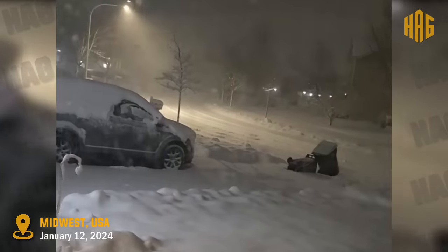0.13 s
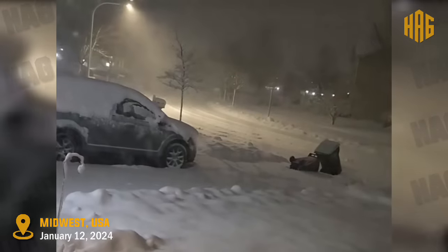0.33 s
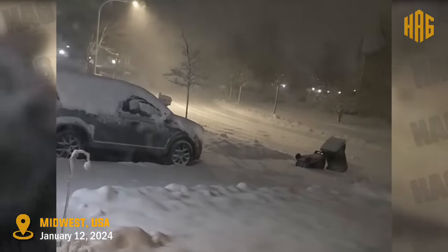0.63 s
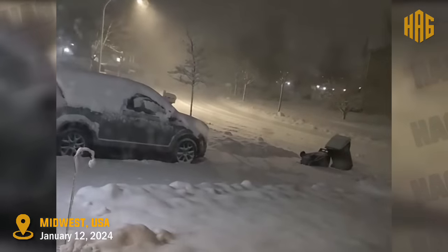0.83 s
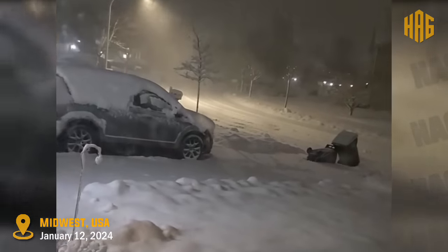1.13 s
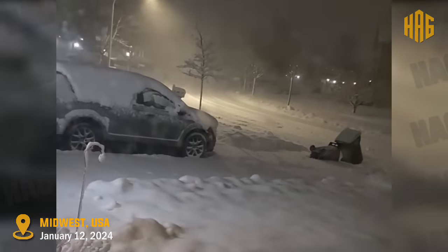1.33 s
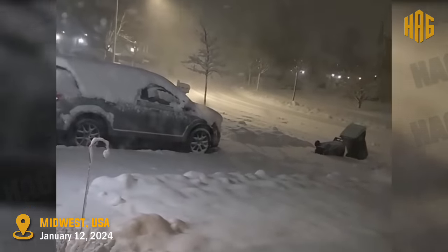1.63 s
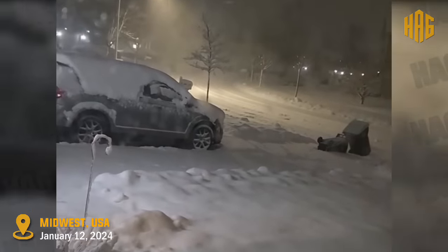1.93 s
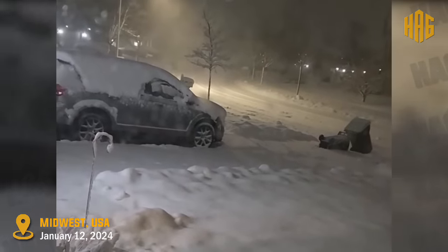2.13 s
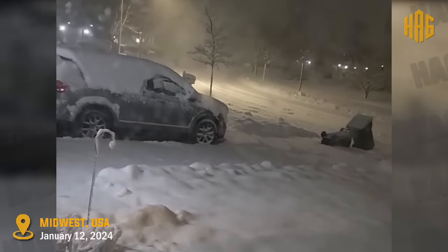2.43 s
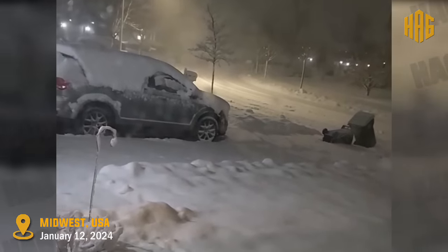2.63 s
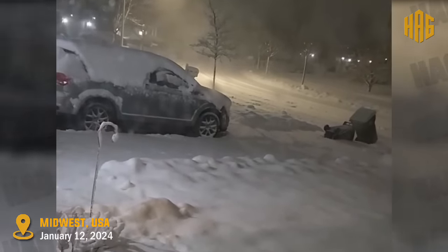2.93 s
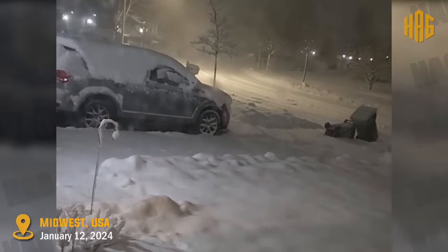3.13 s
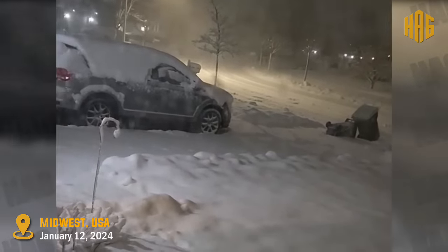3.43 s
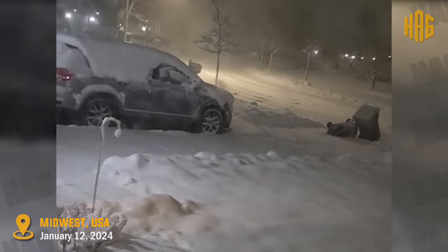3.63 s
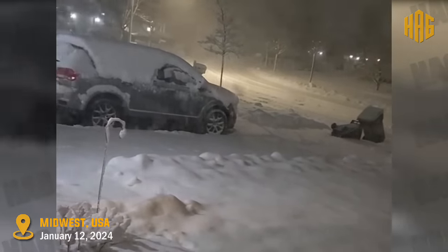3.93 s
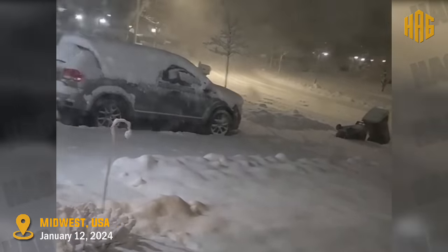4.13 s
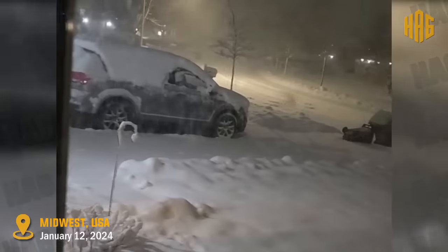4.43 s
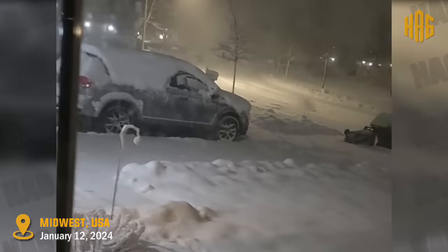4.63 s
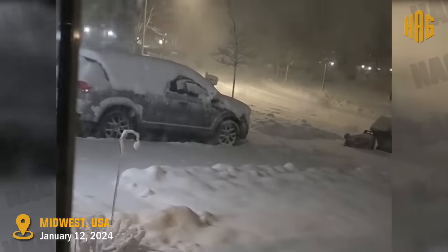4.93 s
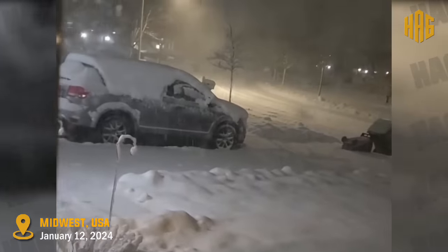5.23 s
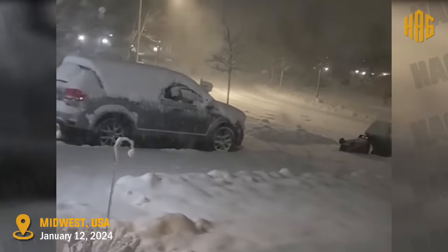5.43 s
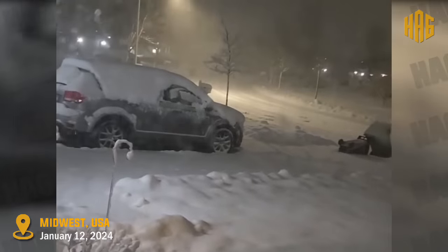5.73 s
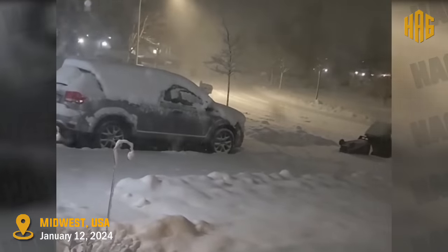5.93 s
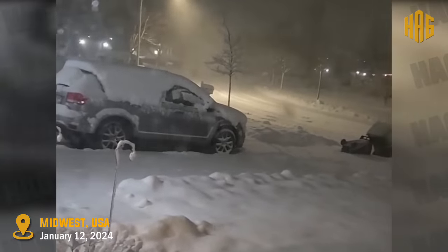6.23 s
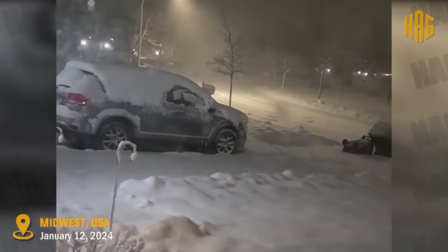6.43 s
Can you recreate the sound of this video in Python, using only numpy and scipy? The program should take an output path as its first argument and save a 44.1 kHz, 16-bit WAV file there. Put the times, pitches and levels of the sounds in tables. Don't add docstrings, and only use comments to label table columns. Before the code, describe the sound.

Strong storm wind presses on a house, giving a continuous dull low rumble with fuzzy wandering tones. A faint motor hum throbs underneath. Tiny finger knocks come early; after about four seconds a sleeve rustles and the phone's plastic case creaks and ticks very close to the microphones, then quiets. Heard indoors at a window on a snowy night.

```python
import sys
import numpy as np
from scipy import signal
from scipy.io import wavfile
from scipy.ndimage import uniform_filter1d

SR = 44100
rng = np.random.default_rng(int(sys.argv[2]) if len(sys.argv) > 2 else 0)


def wav_out(sig):
    wavfile.write(sys.argv[1], SR, np.round(np.clip(np.atleast_2d(sig).T, -1, 1) * 32767).astype(np.int16))


def gain_from_db(level_db):
    decades = np.asarray(level_db, float) / 20
    return 10 ** decades


N = 289869


def evened(x):
    return x / np.sqrt(np.mean(x ** 2) + 1e-20)


def peaked(x):
    return x / abs(x).max(axis=1, keepdims=True)


def read(points, hz):
    f, value = np.transpose(points)
    return np.interp(np.log(hz + 1), np.log(f + 1), value)


def curve(rows, t):
    return np.interp(t, np.array(rows)[:, 0], np.array(rows)[:, 1])


def drift(top_hz):
    r = np.exp(-2 * np.pi * top_hz / SR)
    return evened(signal.lfilter([1], [1, -2 * r, r * r], rng.standard_normal(N)))


def resonate(x, hz, width):
    turn = np.exp(2j * np.pi * np.cumsum(hz * np.ones(x.shape[-1])) / SR)
    r = np.exp(-np.pi * width / SR)
    return 2 * (turn * signal.lfilter([1 - r], [1, -r], x / turn)).real


def resonate_twice(x, hz, width, second_width):
    return resonate(resonate(x, hz, width), hz, second_width)


def sides(db):
    return gain_from_db(np.array([[min(db, 0)], [min(-db, 0)]]))


def add(mix, s, sound):
    part = mix[:, round(s * SR):][:, :sound.shape[1]]
    part += sound[:, :part.shape[1]]


# frequency in Hz, likeness from -1 to 1.
LIKENESS = [(60, 0.97), (130, 0.97), (290, 0.85), (640, 0.27), (1000, -0.35), (1400, -0.15), (3100, 0.05),
            (15000, 0.043)]
# frequency in Hz, left-right difference in dB.
LEAN = [(60, 1), (180, 0), (550, 2.5), (1650, 2), (4970, 2.5), (15000, 3.5)]


def noise(shape, size, patchy_db, flicker_db):
    hop = size // 4
    frames, hz = N // hop + 5, np.fft.rfftfreq(size, 1 / SR)
    a, b, c, d, patches = rng.standard_normal((frames, len(hz), 5)).T
    for axis in (0, 1):
        patches = uniform_filter1d(patches, size=9, axis=axis, mode="wrap")
    same = np.clip(read(LIKENESS, hz), -1, 1)[:, None]
    left = a + 1j * b
    right = same * left + np.sqrt(1 - same ** 2) * (c + 1j * d)
    z = np.array([left, right])
    z *= gain_from_db(np.array([.5, -.5])[:, None, None] * read(LEAN, hz)[:, None])
    z *= shape(hz[:, None], (np.arange(frames) * hop / SR)[None])
    z *= gain_from_db(patchy_db * evened(patches) + flicker_db * rng.standard_normal(frames))
    return signal.istft(z, nperseg=size, noverlap=size - hop)[1][:, :N]


# time in seconds, half length in seconds, level in dB.
PUFFS = [
    (0.591, 0.073, -4),
    (1.0, 0.036, 1.5),
    (1.178, 0.011, -11),
    (2.267, 0.024, 2),
    (3.297, .04, -2),
    (5.44, 0.011, 5),
]


def wind_level(t):
    lull_db, rise_s = -9.5, 0.33
    puffs = sum(db * np.exp(-((t - s) / half) ** 2) for s, half, db in PUFFS)
    return gain_from_db(-36.5 + lull_db * np.exp(-(t / rise_s) ** 2) + puffs)


def sway(s):
    rates = 1.5 * np.geomspace(.1, 1, num=9)[:, None] * rng.uniform(.8, 1.2)
    return evened(np.sin(2 * np.pi * (rates * s + rng.random((9, 1)))).sum(0))


# frequency in Hz, level in dB per Hz.
WALLS = [(15, -46.5), (24, -22.5), (32, -12.5), (45, -14), (70, -10.5), (200, -13.5), (270, -16.5),
         (330, -24), (420, -27.5), (520, -36.5), (700, -76.5)]
# frequency in Hz, width in Hz, level in dB.
HOUSE = [(39.4, 31, -13), (106.4, 13, -2.5), (133.5, 13.5, -3.5), (174.7, 18, -8), (192.2, 6.2, -8),
         (219.1, 9, -8.5), (231.9, 6, -5.5), (240.2, 8, -11), (249.3, 5.35, -3.5), (286, 5.5, -5.5),
         (300, 4.6, -7), (309, 11, -6), (333, 6, -15.5), (353, 6.5, -12.5), (367.1, 5.4, -9.5),
         (381, 3.6, -17.5), (394, 6.7, -24.5), (426.4, 8, -24.5), (477, 7.6, -20), (485.4, 8.8, -14),
         (509, 21, -30.5), (551, 12, -31), (629, 22, -28), (668, 7, -34.5), (743, 5.4, -32),
         (785, 11, -33.5), (840, 10, -36), (932, 6, -34), (1024, 22, -40)]
# time in seconds, half length in seconds, level in dB.
MOANS = [
    (2.2, 0.34, -0.5),
    (5.4, 0.21, -3),
    (5.046, 0.17, 5),
    (6.19, 0.3, -4.5),
    (1.8, 0.12, -2.5),
]


def house(t):
    pane_hz, swell_db, wander = 300, 1.6, .003

    def shape(hz, s):
        moan = sum(db * np.exp(-((s - at) / half) ** 2) for at, half, db in MOANS)
        reach_hz = np.where(moan < 0, 70, 15)
        power = gain_from_db(2 * read(WALLS, hz))
        for f, width, db in HOUSE:
            level = db + swell_db * sway(s) + moan * (abs(f - pane_hz) < reach_hz)
            centre = f * (1 + wander * sway(s))
            power = power + gain_from_db(2 * level) / (1 + (2 * (hz - centre) / width) ** 4)
        return np.sqrt(power)

    return wind_level(t) * evened(noise(shape, size=16384, patchy_db=1., flicker_db=.1))


# time in seconds, level in dB.
SETTLING = [
    (0, -6.5),
    (.3, -10),
    (.6, -4),
    (6.57, -3),
]


def settling_db(t):
    return curve(SETTLING, t)


# frequency in Hz, level in dB.
FAN = [
    (120.0, -37),
    (139.2, -50),
    (77.3, -55),
    (366.2, -65),
]
# time in seconds, throb level in dB.
LOAD = [(0.1, -45.5), (0.28, -45), (0.56, -45), (0.9, -41), (1.13, -53), (1.29, -41), (2.09, -44),
        (2.18, -61), (2.54, -45.5), (2.61, -51.5), (2.75, -41), (3.9, -44), (4.63, -41.5), (4.97, -56),
        (5.47, -43), (6.5, -53.5)]


def fan(t):
    hum = sum(gain_from_db(db + 5.57) * np.cos(2 * np.pi * (hz * t + 0.49)) for hz, db in FAN)
    wheel_hz = 57.5 + 2.2 * drift(4.66)
    wheel = np.cos(2 * np.pi * np.cumsum(wheel_hz) / SR + np.pi)
    return hum * gain_from_db(settling_db(t)) + wheel * gain_from_db(curve(LOAD, t) + 3.5)


# time of the peak in seconds, swell in seconds, fade in seconds,
# rubbing level in dB, level of the brightest part against it in dB.
STROKES = [(0.341, 0.025, 0.66, -80, -15.5), (1.199, 0.16, 0.49, -78, -12), (3.3, 0.27, 0.25, -88.5, -14.5),
           (4.18, 0.13, 0.12, -61.5, -11), (4.46, 0.15, 0.15, -60.5, -15.5),
           (4.641, 0.012, 0.078, -65, -15), (4.77, 0.17, 0.16, -61.5, -12.5),
           (5.12, 0.11, 0.68, -73.5, -10.5), (5.398, 0.54, 0.13, -66, -11),
           (5.563, 0.044, 0.046, -63, -8.5), (5.801, 0.088, 0.13, -74.5, -14),
           (5.904, .05, 0.055, -74.5, -5.5), (6.211, 0.14, 0.34, -83.5, -8.5),
           (6.5, 0.11, 0.11, -75.5, -11)]


def strokes(t, top):
    resting_db, resting_top_db = -89, -7
    power = gain_from_db(2 * (resting_db + top * resting_top_db))
    for s, swell, fade, db, top_db in STROKES:
        length = np.clip(np.where(t < s, swell, fade), .005, 2)
        power = power + gain_from_db(2 * (db + top * top_db)) * np.exp(-2 * abs(t - s) / length)
    return np.sqrt(power)


# frequency in Hz, level in dB per Hz.
CLOTH = [(590, -37.5), (1000, -15.5), (1080, -21), (1330, -7.5), (1460, -8), (1720, -9.5), (2980, -13.5),
         (3270, -15.5), (4120, -12.5), (4520, -13), (5430, -13.5), (6760, -10), (7670, -17.5),
         (9440, -17.5), (15700, -35)]


def sleeve(t):
    def shape(hz, s):
        bright = gain_from_db(13.5) * strokes(s, 0.98) / strokes(s, 0)
        return gain_from_db(read(CLOTH, hz)) * bright ** np.clip((hz - 8500) / 2500, 0, 1)

    rubbing = evened(noise(shape, size=256, patchy_db=1.56, flicker_db=0.9))
    return gain_from_db(9.5) * strokes(t, 0) * rubbing * sides(-3.07)


# time in seconds, level in dB.
STRAIN = [
    (3.9, -90),
    (3.97, -72),
    (4.09, -70),
    (4.115, -56),
    (4.27, -59),
    (4.33, -66),
    (4.37, -57),
    (4.5, -62),
    (4.8, -65),
    (5.0, -70),
]


def strain(t):
    slips = rng.standard_normal((2, N)) * gain_from_db(3.5 * drift(40.))
    hz = 1460
    free = evened(resonate_twice(slips, hz, 150, 260))
    damped = evened(resonate_twice(slips, 1.05 * hz, 600, 850))
    grip = np.interp(t, [4.33, 4.37], [0, 1])
    on = np.interp(t, [3.85, 3.95, 4.95, 5.05], [0, 1, 1, 0])
    return gain_from_db(curve(STRAIN, t) + 1.0) * on * ((1 - grip) * free + grip * damped) * sides(-6.5)


def burst(length, lead, snap):
    u = np.arange(-lead, .06, 1 / SR)
    scrape = np.exp(np.where(u < 0, 3 * u / lead, -u / np.clip(length, .0005, .05)))
    arrival = np.array([[.00014], [0]])
    return snap * np.exp(-((u - arrival) / .00003) ** 2) + scrape * rng.standard_normal((2, len(u)))


# time in seconds, left-right difference in dB.
HAND = [
    (0.4, -1),
    (0.7, 0.5),
    (3.88, 9.5),
    (4.1, -3),
    (4.36, -12),
    (4.5, -8),
    (4.63, -11),
    (4.9, -6),
    (5.55, 2),
    (5.8, 0),
]


def hand_db(s):
    return curve(HAND, s)


# time in seconds, peak in dB, lowest mode in Hz,
# level of the upper modes in dB, length in seconds.
CREAKS = [(4.104, -65, 1300, -10, 0.004), (4.119, -48, 1430, -14, 0.012), (4.233, -61, 1490, -14, 0.01),
          (4.359, -37, 1650, -4, 0.007), (4.388, -47, 1500, 4, 0.0088), (4.418, -38.5, 1500, -7, 0.0029),
          (4.469, -41, 1600, -8, 0.0018), (4.493, -43.5, 1480, -2, 0.0048), (4.507, -47, 1500, -20, 0.005),
          (4.5378, -36, 1560, -22, 0.014), (4.595, -60, 1270, -10, 0.004), (4.629, -39.5, 1530, -14, 0.02),
          (4.751, -47, 1320, -16, 0.008), (4.764, -36, 1580, -9.5, 0.014), (4.855, -39, 1510, -16, 0.0098),
          (4.923, -45, 1430, -16, 0.003)]


def creaks():
    out, lead = np.zeros((2, N)), .009
    opposed = .75
    for s, db, hz, upper_db, length in CREAKS:
        x = burst(length, lead, 13.)
        low = resonate_twice(x, hz, 470, 950)
        low = np.array([(1 - opposed) * low[0] - opposed * low[1], low[1]])
        high = resonate_twice(x, 3900, 1100, 1600) + .15 * resonate(x, 6500, 2200)
        sound = sides(hand_db(s)) * peaked(low) + gain_from_db(upper_db) * sides(-5) * peaked(high)
        add(out, s - lead, gain_from_db(db + 7.0) * sound)
    return out


# time in seconds, level in dB, frequency in Hz,
# width in Hz, length in seconds.
KNOCKS = [(.293, -70, 1350, 300, .005), (.284, -72, 1100, 400, .004), (.298, -65, 2000, 300, .006),
          (.148, -68, 1500, 900, .002), (.36, -64, 1400, 180, .009), (.373, -64, 1430, 250, .007),
          (.372, -69, 1950, 200, .007), (.39, -71, 1700, 1200, .025), (.31, -72, 1800, 1200, .02),
          (.725, -74, 1520, 300, .015), (.51, -76, 2200, 600, .01), (.665, -76, 2100, 200, .02),
          (1.5, -74, 2100, 500, .01), (.38, -79, 7700, 1500, .03), (1.17, -82, 7900, 1700, .07),
          (1.338, -70, 1500, 150, .01), (1.45, -81, 7900, 1700, .08), (3.15, -83, 7900, 1200, .06),
          (3.878, -66, 5350, 400, .007), (3.893, -77, 5300, 700, .015), (3.9, -78, 7700, 1200, .04),
          (4.125, -66, 5500, 1200, .02), (4.178, -61, 4100, 700, .008), (4.476, -51, 4200, 2000, .016),
          (4.172, -60, 6000, 6000, .004), (4.12, -63, 3000, 2500, .012), (4.481, -53, 6200, 900, .006),
          (4.629, -50, 1550, 500, .007), (4.769, -50, 1500, 500, .012), (4.859, -54, 1500, 450, .006),
          (4.48, -60, 1600, 900, .012), (4.778, -61, 7500, 900, .014), (5.568, -64, 1300, 500, .008),
          (5.56, -58, 7800, 700, .003), (5.775, -67, 1300, 500, .008), (5.77, -65, 3700, 500, .004),
          (5.875, -67, 4300, 500, .005), (5.97, -79, 7700, 1500, .09), (6.23, -78, 7800, 1500, .06),
          (6.5, -79, 7700, 1500, .05)]


def knocks():
    out = np.zeros((2, N))
    for s, db, hz, width, length in KNOCKS:
        u = np.arange(-3 * length, 3 * length, 1 / SR)
        rough = evened(resonate_twice(rng.standard_normal((2, len(u))), hz, width, width))
        clear = np.cos(2 * np.pi * (hz * u + rng.random((2, 1))))
        clear = 1.3 * np.exp(-(width / 450) ** 2) * clear
        note = evened((rough + clear) * np.exp(-(u / length) ** 2))
        pan = sides(hand_db(s) * min(1, 2500 / hz))
        add(out, s + u[0], gain_from_db(db) * pan * 2 / 3 * note)
    return out


# time in seconds, peak in dB, centre frequency in Hz,
# left-right difference in dB, length in seconds.
TICKS = [(0.1476, -60.5, 2600, 1, 0.003), (0.1482, -57, 5900, -8, 0.0032), (0.283, -62, 3220, 0, 0.008),
         (0.287, -63, 7600, 0, 0.004), (0.36, -65, 6700, 2, 0.01), (2.086, -62, 5300, 3, 0.02),
         (4.116, -51, 6500, -6, .004), (4.1709, -42, 5000, -13, 0.004), (4.171, -38, 12000, -17, 0.003),
         (4.195, -58, 5000, -4, .002), (4.391, -50, 4500, -9, 0.0034), (4.3891, -49, 12000, -7, .003),
         (4.43, -52, 6500, -9, 0.002), (4.48, -62, 11000, -8, .01), (4.5385, -59, 4500, -1, .003),
         (4.629, -42.5, 3400, 8, .003), (4.756, -52, 5900, -6, 0.0025), (4.763, -49, 3600, -3, .004),
         (4.856, -56, 3200, 4, .003), (5.286, -48.5, 4200, -3, .004), (5.507, -56, 7000, 3, .002),
         (5.5105, -38, 3300, 6, 0.001), (5.5108, -40, 6800, 7, 0.0015), (5.5156, -45, 5200, 4, 0.0023),
         (5.55, -44, 4000, -5, 0.0092), (5.56, -38, 6500, -12, 0.004), (5.5655, -56, 7500, -4, .002),
         (5.769, -62, 4000, -4, 0.0066), (5.9122, -53, 6000, -4, .004), (5.9123, -54, 12000, -13, .004),
         (6.521, -63, 4970, 2, 0.0065)]


def ticks():
    out, lead = np.zeros((2, N)), .003
    no_lows = signal.butter(3, 1100, "high", fs=SR, output="sos")
    for s, db, hz, pan_db, length in TICKS:
        width = 0.52 * hz
        sound = resonate_twice(burst(length, lead, 6.6), hz, width, 2.1 * width)
        sound = resonate(signal.sosfilt(no_lows, sound), hz, 1.5 * width)
        add(out, s - lead, gain_from_db(db + 7.5) * sides(pan_db) * peaked(sound))
    return out


# frequency in Hz, level in dB per Hz.
WHINE = [(400, -30), (520, -4), (600, -2.5), (700, -6.5), (780, -4), (950, -9.5), (1180, -13.5),
         (1450, -14.5), (1750, -25.5), (2100, -21.5), (3000, -29), (4000, -67.5)]


def seals(t):
    whine = noise(lambda hz, _: gain_from_db(read(WHINE, hz)), size=2048, patchy_db=2.2, flicker_db=.1)
    return gain_from_db(settling_db(t) - 59.5) * evened(whine)


# frequency in Hz, level in dB per Hz.
HISS = [(1100, -24.5), (1800, -3.5), (2800, -8), (4500, -8), (6700, -15), (7600, -15.5), (8600, -19),
        (10400, -23), (15700, -22.5)]


def microphone_hiss():
    hiss = noise(lambda hz, _: gain_from_db(read(HISS, hz)), size=1024, patchy_db=2., flicker_db=.4)
    return gain_from_db(-75.5) * evened(hiss)


def scene():
    t = np.arange(N) / SR
    hand = sleeve(t) + strain(t) + creaks() + knocks() + ticks()
    return house(t) + fan(t) + hand + seals(t) + microphone_hiss()


def sudden(x, frames):
    no_lows = signal.butter(4, 2500, "high", fs=SR, output="sos")
    treble = abs(signal.sosfilt(no_lows, x)).max(0)
    snaps = uniform_filter1d(treble, size=60) > 2.6 * uniform_filter1d(treble, size=2500)
    near = uniform_filter1d(1. * snaps, size=1600)
    return np.interp(np.arange(frames) * 512, np.arange(x.shape[1]), near) > 1e-4


# frequency in Hz, gain in dB.
PORT = [(1000, .1), (6000, .1), (6700, -5), (7150, 1), (7700, 5.5), (8600, .1), (10500, .1), (13000, 4),
        (16000, 7)]


def phone(x):
    band_hz, spread_db, bar_db, mask_db = 260, 2.0, 0.86, -31.5
    from_hz, to_hz, fill_db = 1000, 9300, 7.0
    hz, _, z = signal.stft(x, SR, nperseg=2048, noverlap=1536)
    z = z * (gain_from_db(read(PORT, hz)) * (hz < 15780))[:, None]
    line = abs(z) ** 2
    power = uniform_filter1d(line.mean(0), size=41, axis=0)
    below = uniform_filter1d(line.mean(0), size=11, axis=0)[np.arange(len(hz)) // 2]
    chance = rng.standard_normal((z.shape[2], 128))
    chance = evened(uniform_filter1d(chance, size=7, axis=0, mode="wrap")).T
    hz = hz[:, None]
    bar = power * gain_from_db(2 * bar_db) + below * gain_from_db(2 * mask_db)
    bar = bar * gain_from_db(2 * spread_db * chance[(hz[:, 0] / band_hz).astype(int)])
    bar = bar * np.clip(hz / from_hz - 1, 0, 1)
    thinned = 1 / (1 + (bar / (line + 1e-20)) ** 5)
    kept = np.where(sudden(x, z.shape[2]), gain_from_db(-3.5 * (hz > 2300)), thinned)
    even_top = gain_from_db(-fill_db * (hz > to_hz))
    z = z * np.where((hz > from_hz) & (hz < to_hz), kept, even_top)
    return signal.istft(z, SR, nperseg=2048, noverlap=1536)[1]


def roll_off(x):
    return signal.sosfilt(signal.butter(12, 15810, fs=SR, output="sos"), x)


def record(dry):
    padded = np.pad(dry, ((0, 0), (2048, 2048)), "reflect")
    mix = phone(padded)[:, 2048:N + 2048]
    return roll_off(mix)


dry = scene()
out = record(dry)
wav_out(out)
```